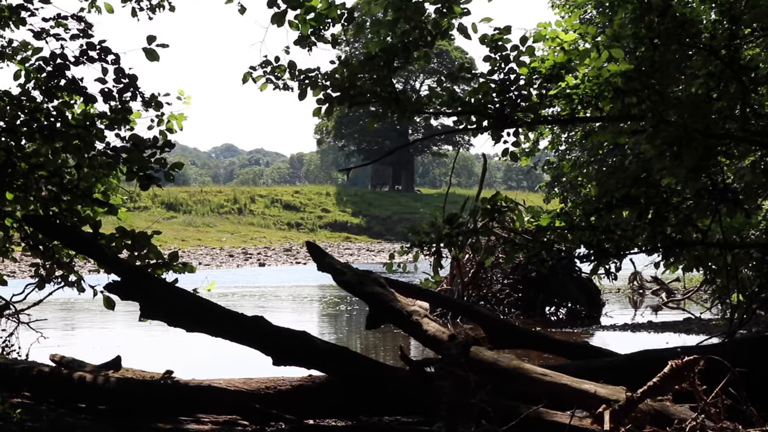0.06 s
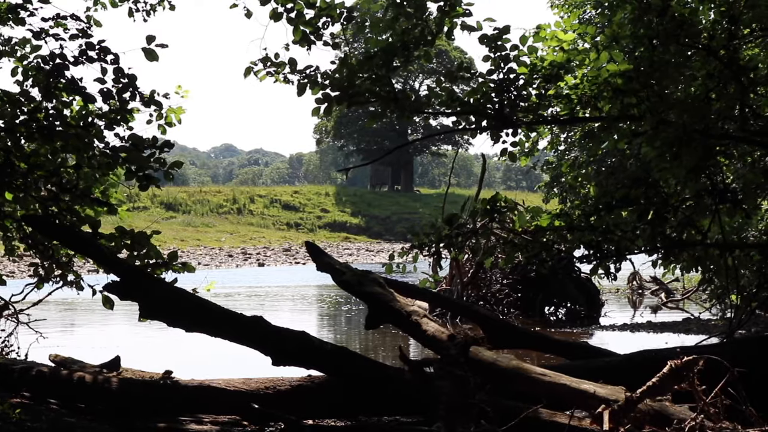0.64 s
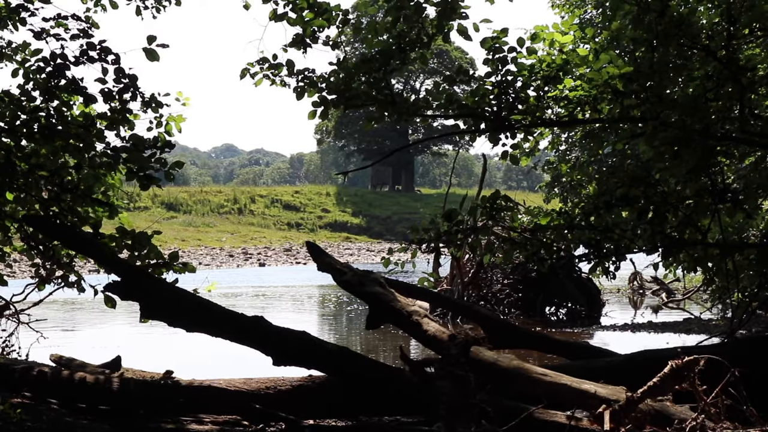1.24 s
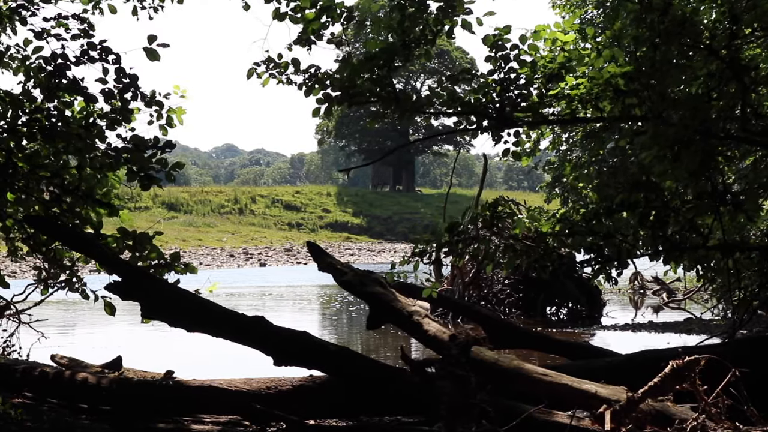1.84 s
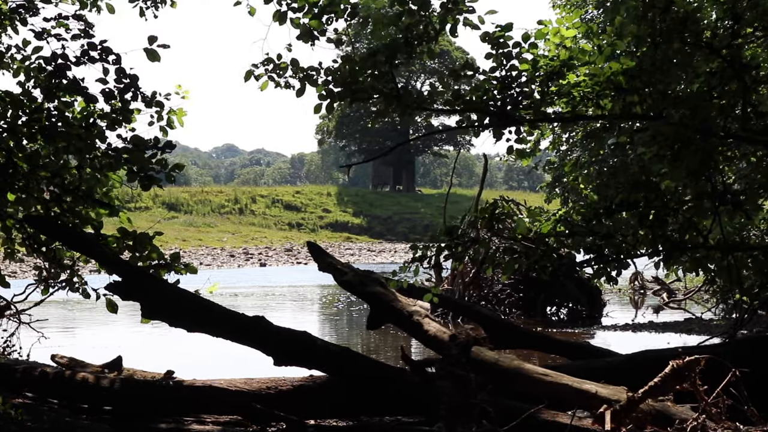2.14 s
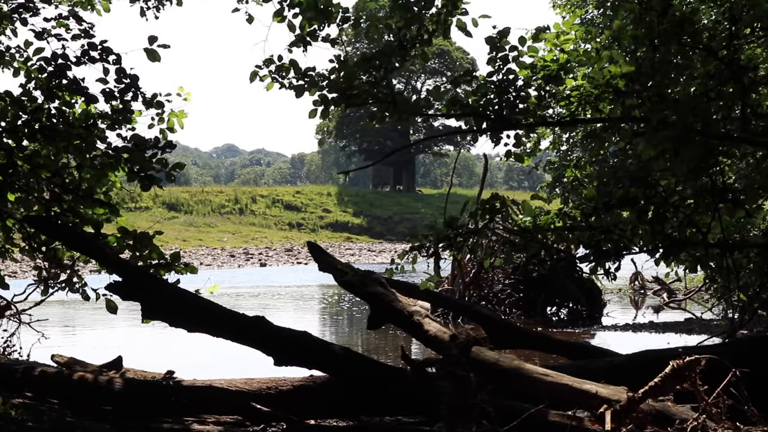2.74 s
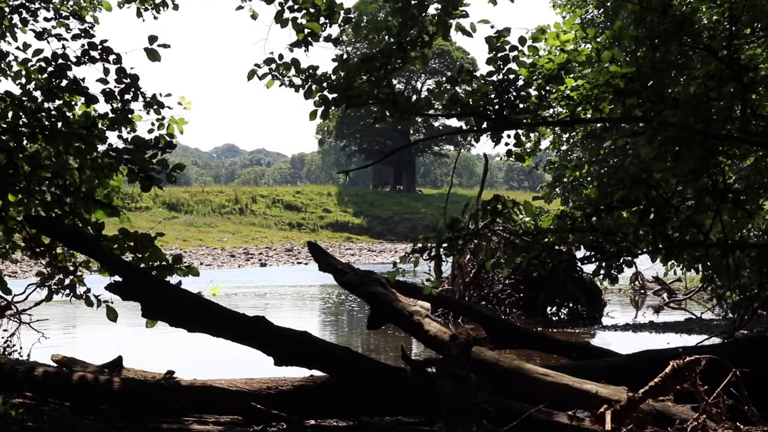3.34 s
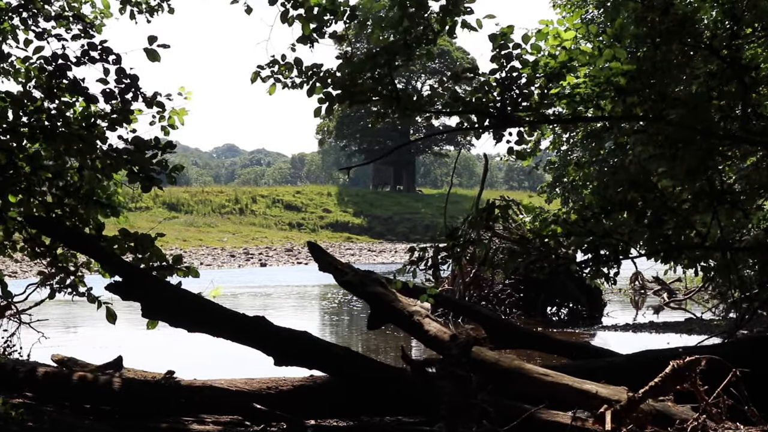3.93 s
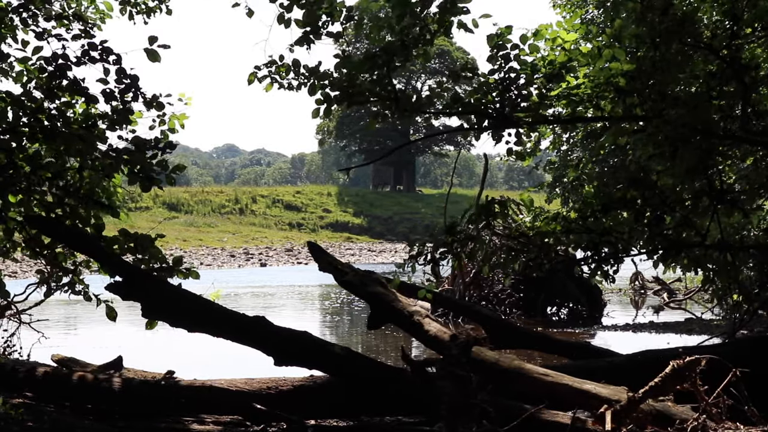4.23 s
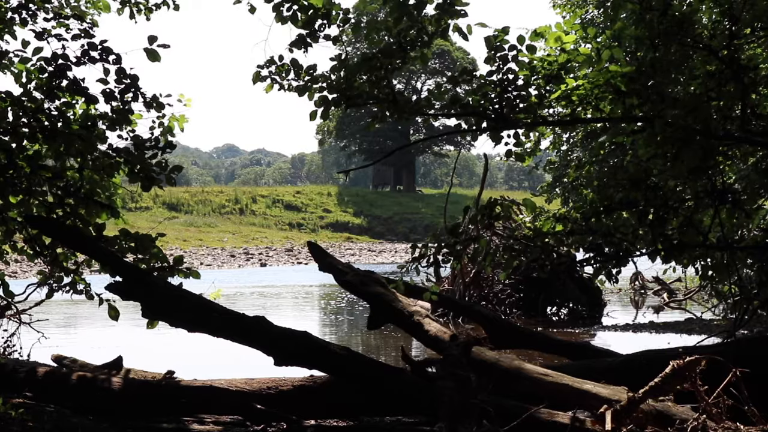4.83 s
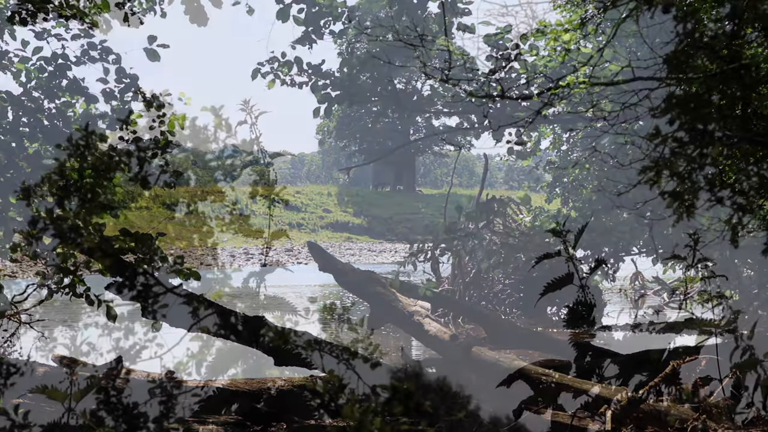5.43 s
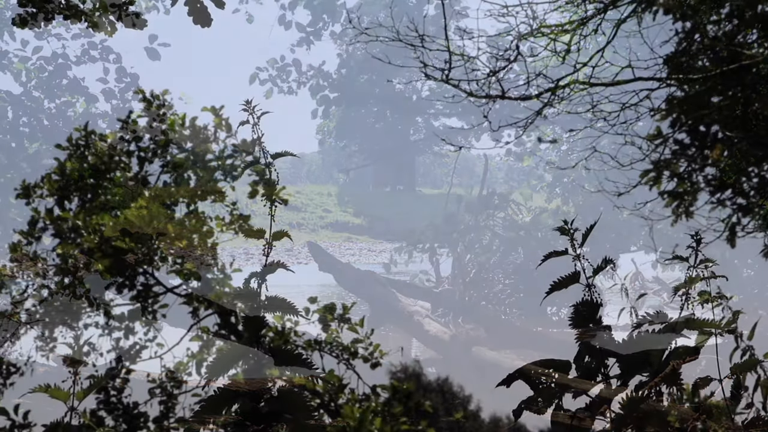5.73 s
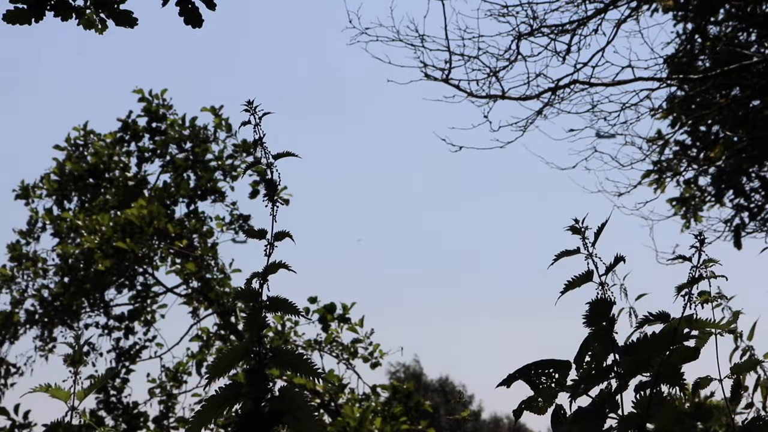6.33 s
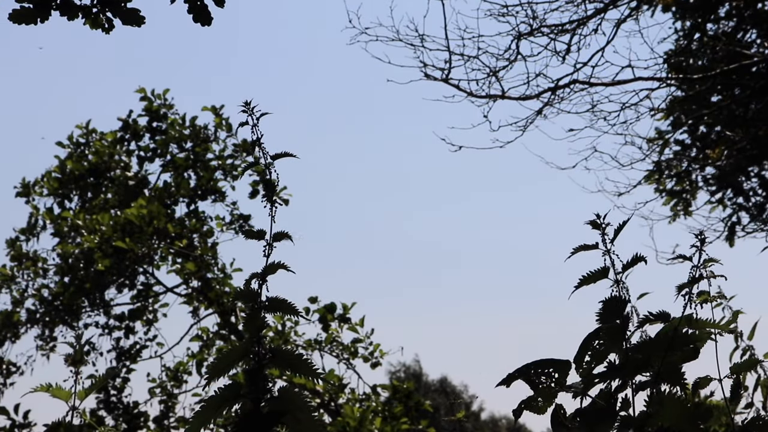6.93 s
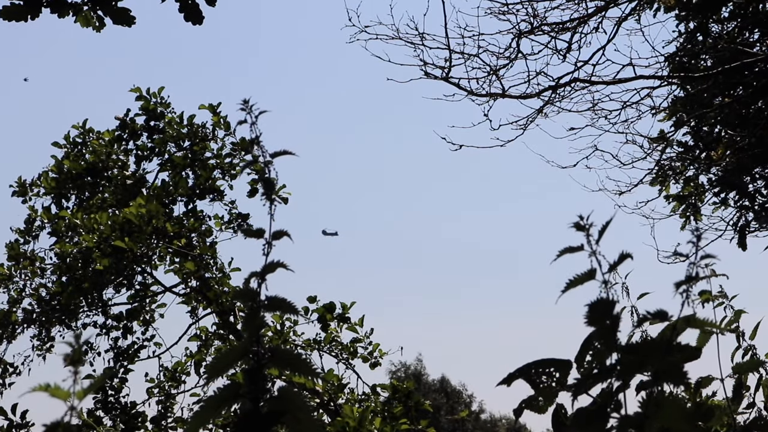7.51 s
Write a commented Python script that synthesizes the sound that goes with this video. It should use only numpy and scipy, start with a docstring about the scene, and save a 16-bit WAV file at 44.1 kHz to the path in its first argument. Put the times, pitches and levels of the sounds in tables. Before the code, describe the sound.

A fast, hollow rotor beat rises out of a steady hiss of leaves as two big helicopters fly toward a microphone among riverside trees. A few dry twigs snap nearby, and a very high bird whistle repeats faintly. The overlapping beats get heavier, then one helicopter goes overhead in a loud, pulsing rush and rumble. The thudding thickens at the end, along with two close twig cracks.

```python
"""Two heavy helicopters approach a wooded river bank; the nearer passes overhead, the other keeps coming.
Each blade passage radiates a low thump, a hollow thud and, by blade-vortex interaction, a rough slap.
The two pulse trains differ slightly in period and slide through each other over swelling rotor wash.
Behind them leaves hiss, a small bird repeats a thin high whistle, and dry twigs fracture close by."""
import sys
import numpy as np
from scipy import signal
from scipy.fft import rfft, irfft, next_fast_len
from scipy.io import wavfile
from scipy.ndimage import uniform_filter1d

SR = 44100
rng = np.random.default_rng(int(sys.argv[2]) if len(sys.argv) > 2 else 0)


def dump(signal):
    """Clip the signal to [-1, 1] and save it as 16-bit WAV at the path in sys.argv[1]."""
    limited = np.clip(np.atleast_2d(signal).T, -1, 1)
    pcm = np.round(limited * 32767).astype(np.int16)
    wavfile.write(sys.argv[1], SR, pcm)


N = 333837
TIME = np.arange(N) / SR

# Spectrum of leaves and distant countryside: f/Hz, relative spectral level/dB
LEAF_SPECTRUM = [(15, -38), (25, 6), (183, 5.5), (240, -1.5), (495, -4.5), (1410, -8.5), (1530, -9),
                 (1710, -10.5), (2170, -10.5), (2360, -13), (3260, -7.5), (6210, -23), (6920, -21.5),
                 (7500, -24.5), (15500, -31.5)]
# Bird whistles: onset t/s, duration/s, initial f/Hz, final f/Hz, level before reverberation/dB
WHISTLES = [(-.4, .65, 7300, 7130, -66), (.45, .66, 7290, 7130, -61), (1.53, .66, 7180, 7150, -64),
            (2.46, .84, 7380, 7080, -65), (3.68, .86, 7330, 7110, -65)]
# Twig fractures: t/s, peak level/dB, splintering time/s, upper cutoff f/Hz
FRACTURES = [(1.461, -35, 0.002, 6500), (1.477, -19, 0.0026, 7400), (1.749, -26.5, 0.0017, 7500),
             (1.805, -34, .002, 6500), (1.83, -19.5, 0.0045, 13000), (1.85, -36, 0.0044, 12000),
             (1.889, -37.5, 0.0049, 8000), (1.984, -24.5, 0.012, 16000), (7.066, -17.5, 0.0057, 3900),
             (7.241, -23, 0.0054, 4500)]
# Modes of dry wood: f/Hz, bandwidth/Hz, gain/dB
WOOD_MODES = [(1990, 2000, 4), (3330, 220, -3.5), (3410, 160, 12.5), (5570, 1200, -5), (6350, 530, -12.5),
              (9300, 1100, -4.5), (11360, 1410, -7)]
# Envelope of the rotor wash: t/s, relative rush level/dB, relative thump level/dB
WASH_LEVELS = [(0, -71.5, -68), (.76, -63.5, -52), (1.0, -55, -45), (1.67, -47, -35), (2.21, -42, -33),
               (2.62, -50.5, -44), (2.87, -37.5, -35), (3.48, -38, -29), (3.75, -43.5, -41),
               (4.5, -42, -32.5), (4.85, -37.5, -34), (5.33, -37, -34), (5.71, -29, -26), (6.0, -26.5, -22),
               (6.45, -24.5, -24), (6.75, -28, -25.5), (7.05, -26.5, -23.5), (7.57, -29, -25.5)]
# Spectrum of the turbulent air: f/Hz, relative spectral level/dB
WASH_SPECTRUM = [(15, -52.5), (25, -9.5), (64, 10), (97, 0.5), (167, 0), (286, -9), (375, -10), (730, -23),
                 (826, -22), (1170, -26), (1610, -28.5), (1730, -32), (2630, -43.5), (4410, -62),
                 (9000, -81.5), (11700, -106), (19800, -120)]
# Brief surges of turbulence: t/s, gain/dB
SURGES = [(4.172, 5.5), (4.402, 5), (4.695, 4.5)]
# Pulses of the far helicopter: t/s, delay behind a steady beat/ms, relative level/dB
FAR_PULSES = [(0, 42, -69), (.6, 28.5, -43.5), (.85, 35.6, -28.5), (1.25, 27.7, -23.5), (2.05, 25.6, -18),
              (2.3, 24, -8.5), (2.6, 25, -11.5), (2.8, 22, -10.5), (3.45, 24.3, -13), (3.7, 24, -6.5),
              (4.02, 26, -7), (4.2, 22, -17.5), (5.3, 12.88, -16), (5.8, 10.3, -5.5), (6.15, 7.45, -19),
              (6.7, 6.77, -2.5), (7.2, 7.4, -7), (7.57, 6.6, -10)]

FAR_PERIOD_S, NEAR_PERIOD_S = .0752, .076493  # between blade passages
CLOSEST_S, CLOSEST_M, FLIGHT_M_S, SOUND_M_S = 4.91, 27.0, 18.49, 343  # the near one's straight flight


def undb(db):
    """Amplitude ratio of a level in decibels."""
    return 10 ** (np.asarray(db) / 20)


def unit(x):
    """Normalisation to unit rms."""
    return x / np.sqrt(np.mean(x ** 2))


def curves(table, at):
    """Linear interpolation of a table's columns in time."""
    s, *columns = np.transpose(table)
    return [np.interp(at, s, column) for column in columns]


def step(at, middle_s, rise_s):
    """Sigmoid transition from 0 to 1."""
    return .5 + .5 * np.tanh((at - middle_s) / (2 * rise_s))


def swell(at, middle_s, width_s):
    """Gaussian rise to 1 and back."""
    return np.exp(-((at - middle_s) / width_s) ** 2)


def puff(rise_s, fall_s):
    """Envelope of exponential growth and decay."""
    t = TIME[:SR // 5]
    return (1 - np.exp(-t / rise_s)) * np.exp(-t / fall_s)


def ring(x, hz, width_hz):
    """Second-order resonance with unit gain at its centre."""
    return signal.lfilter(*signal.iirpeak(hz, hz / width_hz, fs=SR), x)


def band(x, lo_hz, hi_hz, order=3):
    """Maximally flat band-pass filter."""
    return signal.sosfilt(signal.butter(order, [lo_hz, hi_hz], "band", fs=SR, output="sos"), x)


def noise(spectrum):
    """Spectral shaping of white noise by (f/Hz, level/dB) points, at unit rms."""
    hz, db = np.transpose(spectrum)
    size = next_fast_len(N, True)
    bin_hz = np.maximum(np.fft.rfftfreq(size, 1 / SR), 1)
    gain = undb(np.interp(np.log(bin_hz), np.log(hz), db))
    return unit(irfft(rfft(rng.standard_normal(size)) * gain, size)[:N])


def wander(rate_hz):
    """Low-pass random fluctuation of unit rms."""
    hold = int(SR / rate_hz)
    stairs = np.repeat(rng.standard_normal(N // hold + 1), hold)
    return unit(uniform_filter1d(uniform_filter1d(stairs, hold), hold)[:N])


def superpose(times, sizes, shape, lead):
    """Linear superposition of one shape at each time, begun lead samples early."""
    out = np.zeros(N + 2 * SR)
    for t, size in zip(times, sizes * np.ones(len(times))):
        start = SR + int(t * SR) - lead
        out[start:start + len(shape)] += size * shape
    return out[SR:SR + N]


def pulse_train(times, sizes, shape):
    """Repetition of a pulse with its peak on each beat."""
    peak = np.argmax(np.abs(shape))
    return superpose(times, sizes, shape / shape[peak], peak)


def pressure_pulse(hz, width_hz, order):
    """Band limiting: distance rounds a blade's impulse to a few oscillations."""
    shape = signal.unit_impulse(SR // 10)
    for _ in range(order):
        shape = ring(shape, hz, width_hz)
    return shape


def leaves():
    """Incoherent addition: leaves and distant countryside merge into nearly steady noise."""
    return noise(LEAF_SPECTRUM) * undb(-47.5 - 1.5 + 0.23 * wander(1.3))


def bird():
    """Thin tones glide downward and are blurred by reverberation among the trees."""
    song, quaver_hz = np.zeros(N), 35 * wander(60)
    for start, length, from_hz, to_hz, db in WHISTLES:
        sung = (TIME > start) & (TIME < start + length)
        progress = (TIME[sung] - start) / length
        hz = from_hz + (to_hz - from_hz) * progress + quaver_hz[sung]
        song[sung] += undb(db) * np.sin(np.pi * progress) ** 2 * np.sin(2 * np.pi * np.cumsum(hz) / SR)
    t = TIME[:SR // 3]
    reverb = rng.standard_normal(len(t)) * np.exp(-t / 0.062)
    return signal.oaconvolve(song, reverb / np.linalg.norm(reverb))[:N]


def twigs():
    """Breaking fibres excite the modes of dry wood; leaves absorb treble and return a faint tail."""
    out, t = np.zeros(N + SR), TIME[:SR // 5]
    tail = .12 * np.exp(-t / 0.0085) + .018 * np.exp(-t / .04)
    for s, db, splinter_s, top_hz in FRACTURES:
        fibres = rng.standard_normal(len(t)) * (np.exp(-(t / splinter_s) ** 2) + tail)
        wood = sum(undb(mode_db) * ring(fibres, hz, width) for hz, width, mode_db in WOOD_MODES)
        snap = band(wood, 700, top_hz, order=2)
        start = int(s * SR)
        out[start:start + len(t)] += undb(db) * snap / np.abs(snap).max()
    return out[:N]


def far_beats():
    """Propagation delay: the changing path bends the rate of the far helicopter's arrivals."""
    steady = np.arange(0, TIME[-1], FAR_PERIOD_S)
    delay_ms = curves(FAR_PULSES, steady)[0]
    return steady + delay_ms / 1000


def near_beats():
    """Doppler effect: the near helicopter's arrivals crowd on approach and spread as it recedes."""
    emitted = np.arange(.0245 - 2 * NEAR_PERIOD_S, TIME[-1], NEAR_PERIOD_S)
    range_m = np.hypot(FLIGHT_M_S * (emitted - CLOSEST_S), CLOSEST_M)
    arrivals = emitted + (range_m - CLOSEST_M) / SOUND_M_S
    return arrivals[arrivals < TIME[-1]]


def tree_echoes(times, sizes, pulse, envelope, drift_hz):
    """Multipath scattering: four echo patterns recur each beat, their mix drifting as the source moves."""
    out, peak = np.zeros(N), np.argmax(np.abs(pulse))
    for _ in range(4):
        echo = signal.fftconvolve(pulse, envelope * rng.standard_normal(len(envelope)))
        out += wander(drift_hz) * superpose(times, sizes, unit(echo), peak)
    return unit(out)


def ground_reflection(sound, elevation):
    """Destructive interference at low angles cancels the band between thump and thud."""
    return sound - (1 - elevation) * ring(sound, hz=119, width_hz=96)


def thumps(near, far, air):
    """Thickness noise: air displaced by the blades gives low pulses, joined by deep turbulence."""
    thump = pressure_pulse(hz=56.2, width_hz=83, order=3)
    pulses = pulse_train(near + 0.0049, 0.79, thump) + 0.92 * pulse_train(far + 0.01867, 0.62, thump)
    return unit(unit(pulses) + 0.53 * unit(band(air, 18, 110)))


def rumble(far, air, rush_db, elevation):
    """Turbulence and a drone of merged echoes add in power; the drone's share grows with elevation."""
    pulse = pressure_pulse(hz=163, width_hz=62, order=3)
    drone = tree_echoes(far, 1, pulse, puff(0.0072, 0.058), drift_hz=1.208)
    air_share = .87 - 0.1 * elevation
    mix = np.sqrt(air_share) * unit(band(air, 100.7, 440)) + np.sqrt(1 - air_share) * drone
    level_db = 0.86 * rush_db + 8.5  # low sound carries farther and swells less
    departure_db = -4 * step(TIME, middle_s=7.2, rise_s=.06)
    return mix * undb(level_db + departure_db)


def rotor_wash():
    """Turbulent noise, amplitude-modulated at the blade-passage rates, swells above the thumps."""
    surge_db = sum(db * swell(TIME, s, width_s=0.055) for s, db in SURGES)
    rush_db, thump_db = curves(WASH_LEVELS, TIME) + surge_db
    elevation = 0.92 * step(TIME, middle_s=3.23, rise_s=0.28)  # 0 behind the trees, 1 in open sky
    near, far = near_beats(), far_beats()
    swish = puff(0.024, 0.015)
    throb = unit(1 + .5 * pulse_train(near, 0.62, swish) + 0.083 * pulse_train(far, 0.49, swish))
    air = noise(WASH_SPECTRUM)
    low = thumps(near, far, air) * undb(thump_db + 1)
    body = rumble(far, air, rush_db, elevation)
    rush = unit(band(air, 431.4, 1913)) * undb(rush_db + 2.5 + 0.3 * wander(14))
    hiss_db = rush_db - 13 + 4.5 * elevation  # treble gains as the trees cease to screen it
    hiss = unit(band(air, 1557, 9000)) * undb(hiss_db + 0.77 * wander(14))
    return ground_reflection(low + throb * (body + rush + hiss), elevation)


def vortex_slap(times, sizes, torn_db):
    """Blade-vortex interaction: cutting a tip vortex gives a sharp crack and a burst of torn air."""
    crack = band(pressure_pulse(hz=600, width_hz=440, order=2), 160, 1100, order=2)
    air = noise([(100, -6.5), (300, 5), (450, 2.5), (750, -14), (1400, -25), (3000, -40), (8000, -68)])
    torn_air = pulse_train(times, sizes, puff(0.0093, 0.01)) * air
    return pulse_train(times, sizes, crack) + undb(torn_db) * torn_air


def blades(times, thud_db, slap_db, thud_hz, width_hz, echo_db, torn_db):
    """Impulsive rotor noise: each blade radiates a thud, trailed by tree echoes, and a slap."""
    thud_spread, slap_spread = rng.standard_normal((len(times), 2)).T
    thud_sizes, slap_sizes = undb(thud_db + 0.52 * thud_spread), undb(slap_db + 2.2 * slap_spread)
    thud = pressure_pulse(thud_hz, width_hz, order=4)
    thuds = pulse_train(times, thud_sizes, thud)
    echoes = tree_echoes(times, thud_sizes, thud, puff(0.0026, 0.013), drift_hz=3) * np.std(thuds)
    return thuds + undb(echo_db) * echoes + vortex_slap(times, slap_sizes, torn_db)


def far_rotor():
    """Impulsive noise at long range: the far helicopter is mostly thud, with a soft slap."""
    times = far_beats()
    level_db = curves(FAR_PULSES, times)[1]
    return blades(times, level_db - 3, level_db - 34, thud_hz=182, width_hz=160, echo_db=-10.5, torn_db=10)


def rear_rotor():
    """Interleaved pulse trains: once past, the near helicopter adds deeper thuds between its beats."""
    times = near_beats() + .0525
    beats = blades(times, thud_db=-6.5, slap_db=-26.5, thud_hz=141, width_hz=190, echo_db=-2, torn_db=6.5)
    return beats * step(TIME, middle_s=7.03, rise_s=0.081)


def front_rotor():
    """Directivity: the near helicopter's front rotor follows its wash in level and beams thuds forward."""
    times = near_beats()
    rush_db = curves(WASH_LEVELS, times)[0]
    beam_s, sweep_s = 4.48, 0.49
    beam_db = 15 * swell(times, beam_s, sweep_s) - 9 * step(times, beam_s + 2 * sweep_s, sweep_s)
    thud_db = rush_db + 19.5 + beam_db
    slap_db = rush_db + 3 + .35 * beam_db  # the slap is less directional
    return blades(times, thud_db, slap_db, thud_hz=182.6, width_hz=140, echo_db=-13, torn_db=3)


def scene():
    """Superposition of both helicopters and the river bank in one channel."""
    return (far_rotor() + front_rotor() + rear_rotor() + rotor_wash() + leaves() + bird() + twigs())[None]


def record(dry):
    """Soft saturation rounds the peaks, a brief fade closes the sound and a low-pass cuts the top."""
    rounded = dry / (1 + np.abs(dry / .9) ** 6) ** (1 / 6)
    fade = np.minimum((TIME[-1] - TIME) / .004, 1)
    low_pass = signal.ellip(10, .1, 80, 15800, fs=SR, output="sos")
    return signal.sosfilt(low_pass, rounded * fade)


dry = scene()
out = record(dry)
dump(out)
```